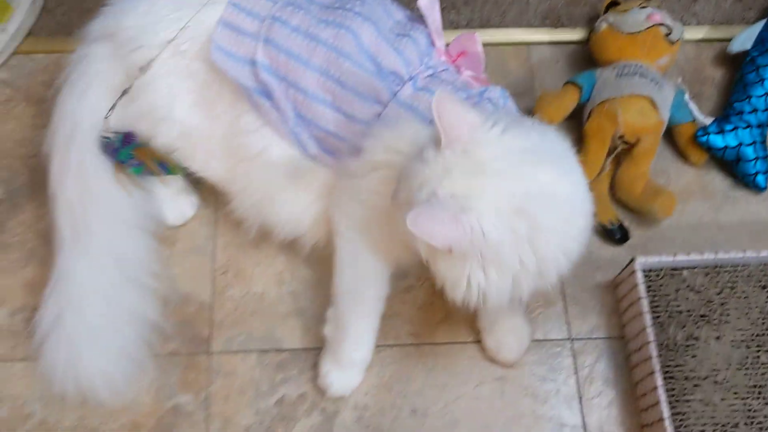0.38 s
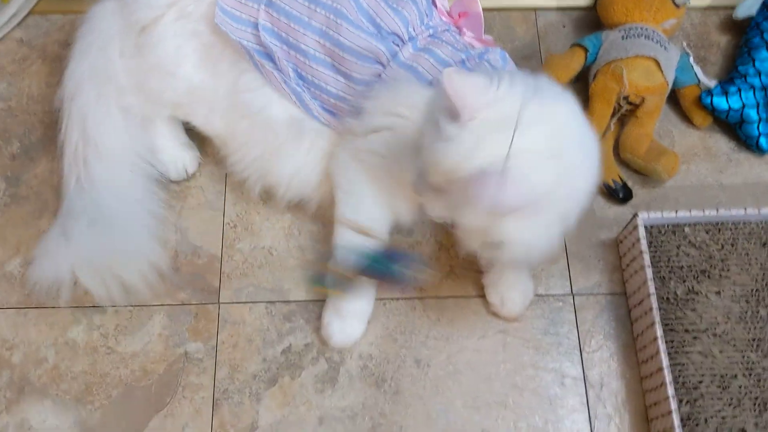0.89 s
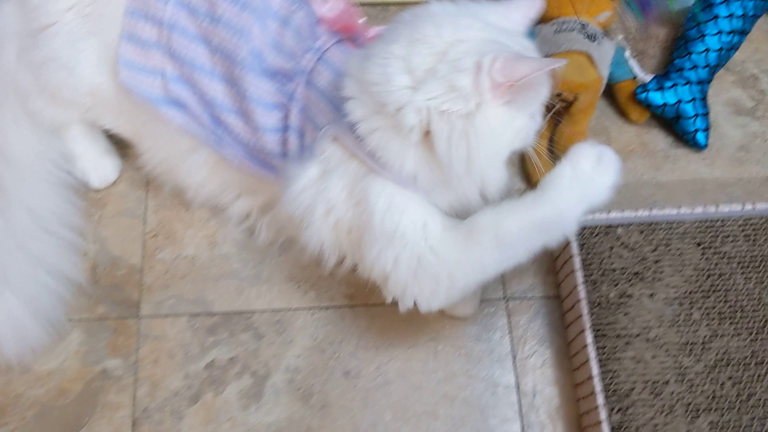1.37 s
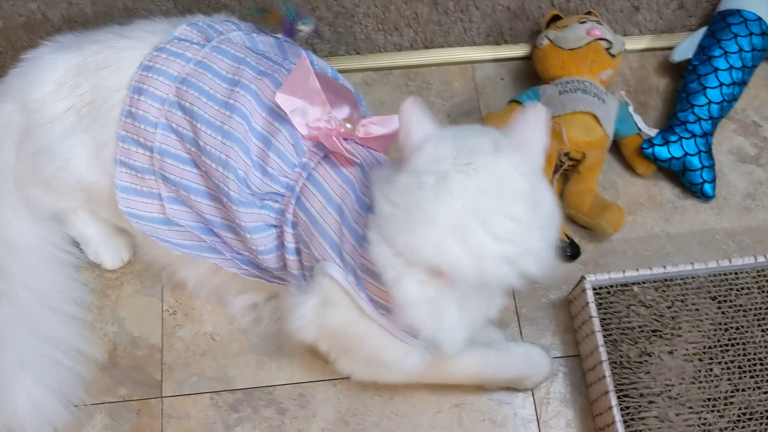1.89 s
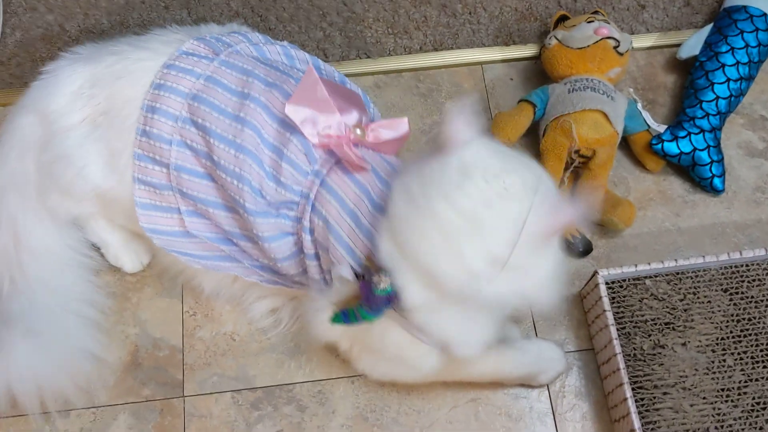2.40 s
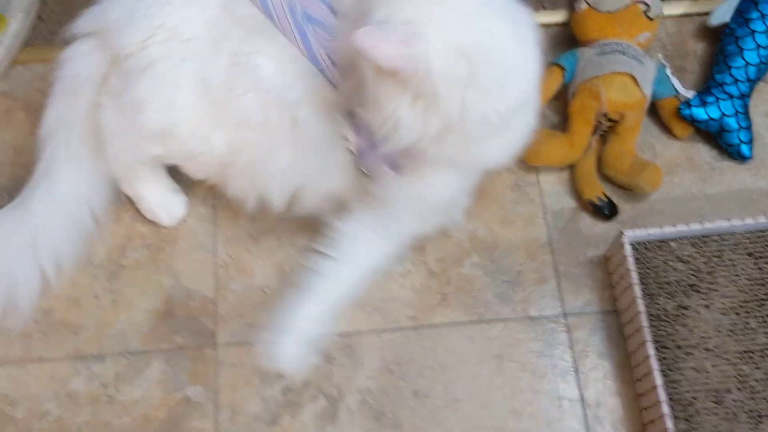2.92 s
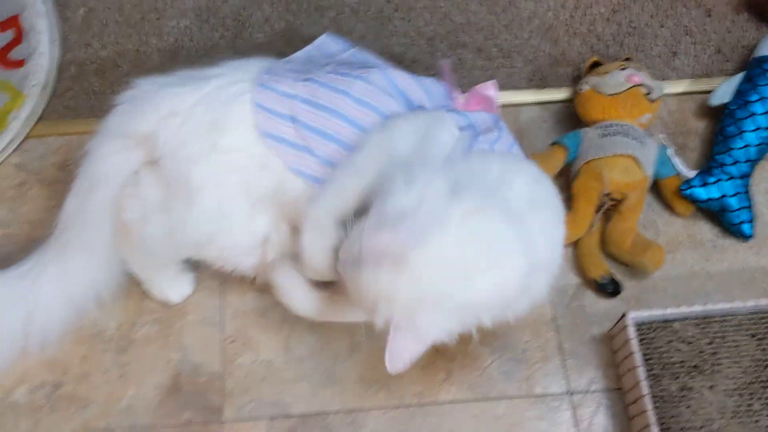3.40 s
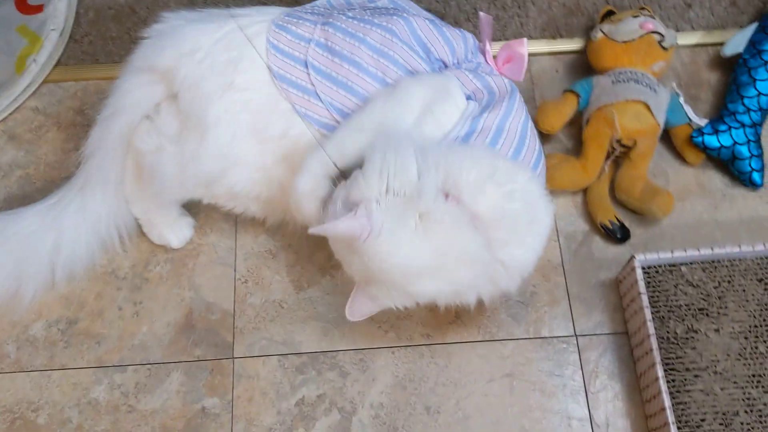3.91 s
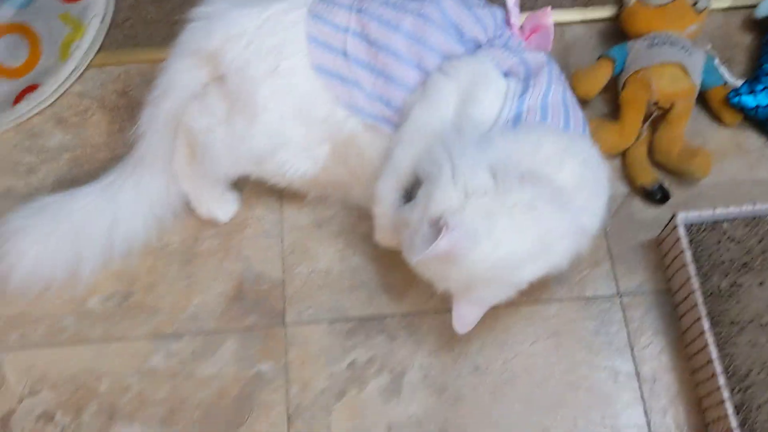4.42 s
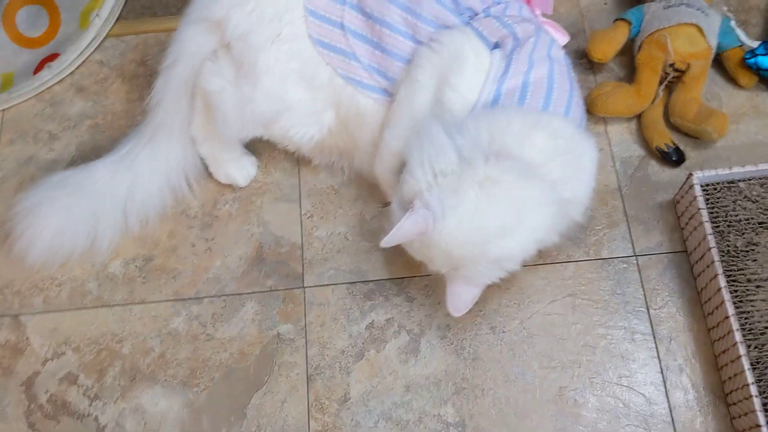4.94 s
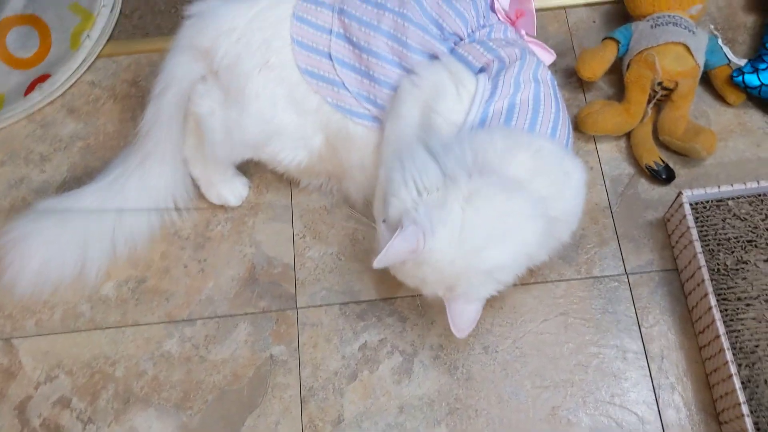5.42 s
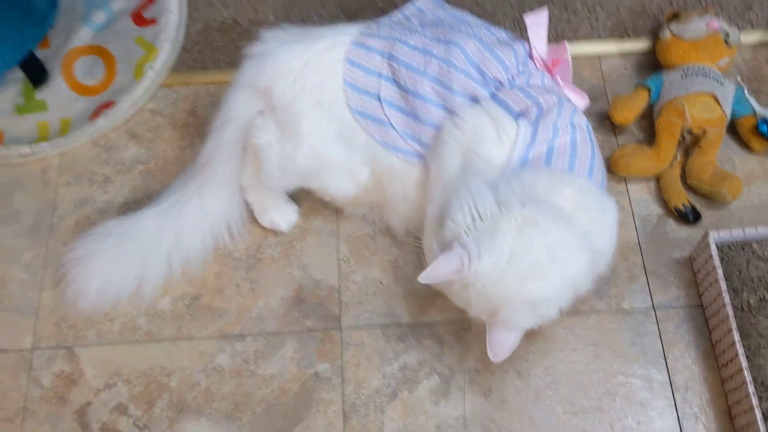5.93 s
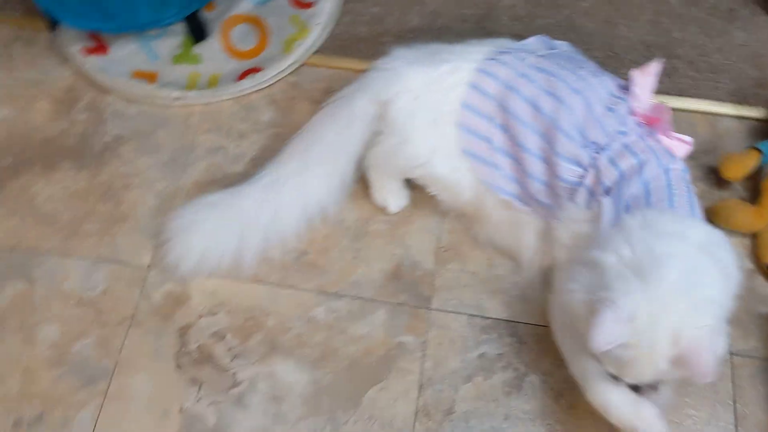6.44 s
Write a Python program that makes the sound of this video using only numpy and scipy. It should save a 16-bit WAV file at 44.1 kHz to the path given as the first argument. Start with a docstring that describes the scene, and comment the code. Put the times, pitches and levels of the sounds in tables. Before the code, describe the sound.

Bright, tiny jingles and dry claw clicks on a tile floor, over quiet rumbling room tone, a faint whine and dull bumps from the hand-held microphones.

```python
"""Cat and feather toy on tile

A cat wrestles a feather toy on a tile floor in a quiet room, close to a hand-held pair of microphones.
The collar bell and the toy's bell are sums of decaying modes driven by a loose pellet; claws tick on the
tile as noise snaps with scuffs, the coat rustles in grains, and the hand jolts the case in short swings.
Room tone is shaped noise and the whine a set of wavering sines. The right microphone is open and bright;
the left one is muffled and hears mostly rumble and whine."""
import sys
import numpy as np
from scipy import signal
from scipy.fft import rfft, irfft
from scipy.io import wavfile
from scipy.ndimage import uniform_filter1d

SR = 44100
rng = np.random.default_rng(int(sys.argv[2]) if len(sys.argv) > 2 else 0)


def natural_amplitude(level_db):
    """Convert a level in decibels to a linear amplitude factor, elementwise."""
    exponent = np.asarray(level_db, float) / 20
    return 10 ** exponent


def transcribe(u):
    """Save the signal u as a 16-bit wav file named by the first command-line argument.

    u: samples, shape (n,) or (channels, n), limited to [-1, 1]; the rate is SR.
    q: integer samples, one column per channel.
    """
    v = np.clip(np.atleast_2d(u).T, -1, 1)
    q = np.round(v * 32767).astype(np.int16)
    wavfile.write(sys.argv[1], SR, q)


N = 289737  # samples
LAG_S = .0003  # s by which the left microphone hears shared sound late

# strikes of each bell's pellet: t/s, peak level/dB, f/Hz of the mode struck best,
# lift/dB of the modes below 10 kHz
COLLAR_STRIKES = [(1.1199, -40, 12900, 2), (1.14, -33.5, 14600, 8), (1.1694, -31, 13310, 14),
                  (1.2098, -46, 12300, 2), (1.2855, -43.5, 12520, -2), (1.6965, -46.5, 12600, 2),
                  (1.7423, -42.5, 12650, 0), (1.8213, -35, 12600, 8), (1.8706, -46, 12100, 0),
                  (2.0155, -44, 12650, 13), (2.123, -45, 12300, 0), (2.5905, -44, 13100, 7),
                  (2.6319, -39, 13720, 0), (2.6623, -25, 12600, -6), (2.6893, -27, 13720, 8),
                  (2.707, -20, 12700, 5), (2.73, -40, 12000, 6), (2.7641, -47, 13100, 2),
                  (2.7967, -30, 12900, 7), (2.806, -16, 12300, 2), (2.925, -36.5, 12670, 6),
                  (2.9851, -40, 13720, 4), (3.016, -37, 14600, 3), (3.3757, -45, 14500, 18),
                  (3.4191, -40.5, 12900, 13), (3.4594, -45, 13000, 6), (3.495, -37, 13530, 6),
                  (6.349, -32, 14600, 9), (6.3744, -35.5, 14600, 2)]
TOY_STRIKES = [(4.6105, -41, 14000, 13), (4.629, -35.5, 13400, 6), (4.6825, -30.5, 14250, 3),
               (4.793, -17, 14200, -4), (4.8843, -27, 14100, -31), (4.9, -37, 12100, -29),
               (4.929, -43, 13700, 6), (4.9743, -32, 14270, 3), (4.999, -20.5, 13000, 1),
               (5.0297, -36, 13600, -1), (5.0988, -40.5, 11860, -10), (5.123, -48, 11800, -9),
               (5.2014, -46, 12260, -26), (5.2424, -51, 12260, -25), (5.284, -53, 11760, -24),
               (5.3453, -49, 12850, -28), (5.4286, -24.5, 13370, -4)]
# colour of small contact sounds in the open microphone: f/Hz, relative level/dB; the sounds end steeply just
# above 16 kHz
OPEN_COLOUR = [(600, -39), (1100, -13), (1600, -12), (3000, -2.5), (6000, 4), (8600, -2.5), (10500, 8),
               (13000, 4), (15700, 4), (16050, -27)]


def evened(x):
    """Normalization: scales a signal to an rms value of 1."""
    return x / np.sqrt(np.mean(x ** 2) + 1e-20)


def read(f, value, hz):
    """Interpolation of a spectrum by straight lines on a log-frequency axis."""
    return np.interp(np.log(hz + 1), np.log(np.add(f, 1)), value)


def add(mix, s, sound):
    """Superposition: adds a sound to the mix in place from time s."""
    part = mix[max(round(s * SR), 0):][:len(sound)]
    part += sound[:len(part)]


def slow(rate_hz):
    """Random modulation of rms 1: sines of random phase over the decade up to rate_hz."""
    t = np.arange(N) / SR
    rates = np.geomspace(rate_hz / 10, rate_hz, 16)
    return evened(sum(np.sin(2 * np.pi * (f * t + rng.random())) for f in rates))


def room_tone():
    """Partly coherent noise in two channels, shaped by frequency; the trembling hand makes the bass lumpy."""
    # steady spectrum: f/Hz, relative left level/dB, relative right level/dB
    air_spectrum = [(20.4, -83, -83), (42.8, -64.5, -66), (79, -54.5, -71.5), (101, -63.5, -65.5),
                    (133, -69.5, -57.5), (180, -68.5, -67), (290, -74.5, -71.5), (535, -82.5, -81.5),
                    (658, -80, -81.5), (790, -93.5, -84), (1430, -90.5, -84), (2120, -94.5, -91.5),
                    (4570, -97, -98.5), (6100, -102, -102), (8450, -105, -105), (9900, -106, -102),
                    (13000, -114, -95.5), (16500, -123, -102.5)]
    # coherence between the microphones: f/Hz, left-right likeness (1 = identical)
    likeness = [(40, .8), (130, .7), (300, .8), (600, .8), (800, .55), (1200, .05), (16000, 0)]
    # narrow bands that stand out: f/Hz, width/Hz, left rise/dB, right rise/dB
    hum_bands = [(228, 25, 4, 3), (395, 70, 3, 3), (595, 40, 4, 4), (2010, 30, 4, 0), (2400, 200, 0, 3),
                 (6250, 400, 2, 5), (6950, 300, 2, 4), (9550, 300, 4, 0), (12270, 90, 0, 4),
                 (13750, 240, 11, 8), (14620, 240, 13, 9), (15600, 300, 14, 3)]
    rms_db, edge_hz = -48.5, 15830  # level of the whole; nothing is made above the edge
    bass_lag = 1.77  # rad, further phase lag of the left in the deepest bass

    frames, hz = N // 512 + 5, np.fft.rfftfreq(2048, 1 / SR)
    a, b, c, d, patches = rng.standard_normal((frames, 1025, 5)).T
    left = a + 1j * b
    same = np.clip(read(*np.transpose(likeness), hz), -1, 1)[:, None]
    right = same * left + np.sqrt(1 - same ** 2) * (c + 1j * d)
    z = np.array([left, right])
    lag = 2 * np.pi * hz * LAG_S + bass_lag / (1 + (hz / 150) ** 2)
    z[0] *= np.exp(-1j * lag)[:, None]

    # neighbouring times and frequencies swell together
    patch_db = 0.95 * evened(uniform_filter1d(uniform_filter1d(patches, 6, 1), 12, 0))
    z *= (hz < edge_hz)[:, None] * natural_amplitude(patch_db)

    f, *sides = np.transpose(air_spectrum)
    level_db = np.array([read(f, side, hz) for side in sides])
    for peak_hz, width_hz, *rise_db in hum_bands:
        level_db = level_db + np.outer(rise_db, np.exp(-(2 * (hz - peak_hz) / width_hz) ** 2))
    tremble_db = 4.23 * evened(uniform_filter1d(rng.standard_normal(frames), 3))
    z *= natural_amplitude(level_db[..., None] + tremble_db / (1 + (hz[:, None] / 170) ** 4))
    return natural_amplitude(rms_db) * evened(signal.istft(z, nperseg=2048, noverlap=1536)[1][:, :N])


def whine():
    """Amplitude modulation: thin sine tones whose levels waver, each reaching the left a little late."""
    # tones: f/Hz, left rms level/dB, right rms level/dB, rms wavering/dB
    whine_tones = [(376.5, -71, -69, 3.0), (413.5, -72, -71, 3.0), (472.5, -74, -73, 3.0),
                   (591, -71, -70, 2.5), (4501, -77.5, -83.5, 4.0)]
    out = np.zeros((2, N))
    late = np.arange(N) / SR - [[LAG_S], [0]]
    for hz, left_db, right_db, waver_db in whine_tones:
        tone = np.sin(2 * np.pi * (hz * late + rng.random())) * natural_amplitude(waver_db * slow(36))
        out = out + natural_amplitude([[left_db], [right_db]]) * evened(tone)
    return out


def rustle():
    """Granular friction: random tiny crackles of fur and cloth, denser around each jingle as the coat shifts."""
    rms_db, grains_per_s = -75, 98  # the rate is that between jingles, before its slow drift
    stir_s, grain_decay_s = 0.033, 0.0093
    t = np.arange(N) / SR
    stir = sum(np.exp(-((t - hit[0]) / stir_s) ** 2) for hit in COLLAR_STRIKES + TOY_STRIKES)
    busy = natural_amplitude(1.5 * slow(3.6)) * (1 + stir)
    size = natural_amplitude(3.5 * np.minimum(rng.exponential(1, N), 3))
    size = size * (rng.random(N) < busy * grains_per_s / SR)
    grain = np.exp(-np.arange(1500) / (grain_decay_s * SR))
    puff = rng.standard_normal(N) * signal.oaconvolve(size, grain)[:N]
    colour = natural_amplitude(read(*np.transpose(OPEN_COLOUR), np.fft.rfftfreq(N, 1 / SR)))
    return natural_amplitude(rms_db) * evened(irfft(rfft(puff) * colour, N))


def ticks():
    """Impact and friction: claws and toy give a snap of about a millisecond, then a dying scuff of small grains."""
    # contacts with the tile: t/s, strength/dB, lift of the lows/dB, scuff level relative to strength/dB
    tile_contacts = [(0.021, -42, 1, -10), (0.2637, -51, 14, -22), (2.2744, -48, -7, -10),
                     (2.356, -34, -3, -17), (2.987, -47.5, 3, -4), (3.024, -48, -6, -25),
                     (3.0468, -20, -6.5, -20.5), (3.058, -41, -12, -21), (3.303, -43, -24, -22),
                     (3.4955, -42, -3, -16), (3.573, -53, 6, -20), (4.0134, -50, -11, -22),
                     (4.6141, -45, 22, -8.5), (4.795, -29.5, -5, -22), (4.8847, -42.5, 4, -8.5),
                     (4.897, -42, 5, -12), (5.429, -35.5, -2, -18), (6.107, -44, -9, -2),
                     (6.2143, -49, -2, -3), (6.246, -43.5, 28, -13), (6.2785, -40.5, -12, -8.5),
                     (6.3505, -43, 5, -18), (6.505, -49.5, -4, 1), (6.535, -50, 0, -3)]
    scuff_t60, scuff_rise_s = 0.13, 0.00097  # s
    snap_size, snap_decay_s = 3.0, .00025
    push = 0.27  # one-sided push that gives the snap its lows

    out, t, hz = np.zeros(N), np.arange(8192) / SR, np.fft.rfftfreq(8192, 1 / SR)
    colour_db = read(*np.transpose(OPEN_COLOUR), hz)
    for s, strength_db, low_db, scuff_db in tile_contacts:
        hiss, chance = rng.standard_normal((2, 8192))
        grains = .5 + 12.6 * uniform_filter1d(1. * (chance > 2.6), 30)
        scuff = hiss * grains * natural_amplitude(scuff_db - 60 * t / scuff_t60)
        snap = (hiss + push) * np.exp(-t / snap_decay_s) * (t < 4 * snap_decay_s)
        snap = snap_size * snap / np.linalg.norm(snap)
        drive = np.roll(scuff * (1 - np.exp(-t / scuff_rise_s)) + snap, 64)
        # a soft blow is stronger in the lows, and deeper
        corner_hz = 6000 * np.exp(-max(low_db - 5.5, 0) / 30)
        tilt_db = low_db / (1 + (hz / corner_hz) ** 4)
        sound = irfft(rfft(drive) * natural_amplitude(colour_db + tilt_db))
        add(out, s - 30 / SR, natural_amplitude(strength_db) * sound)
    return out


def jolts():
    """Forced resonance: a hand jolt is a swing falling in pitch on the left; on the right it rings the mount."""
    # jolts of the case: t/s, left swing level/dB, right ring peak level/dB
    hand_jolts = [(0.2648, -30.5, -41), (0.335, -31.5, -40), (0.7547, -37, -40), (1.635, -31.5, -34.5),
                  (1.9455, -36, -43), (3.166, -31.5, -37.5), (3.4545, -10.5, -17), (3.482, -13, -18.5),
                  (3.5112, -26.5, -54), (3.836, -8.5, -24), (3.858, -8.5, -13.5), (3.877, -14, -17.5),
                  (4.1497, -28, -38.5), (4.1996, -34.5, -36), (4.246, -32, -44), (4.469, -35.5, -38.5),
                  (4.516, -28.5, -35.5), (4.583, -22.5, -30), (4.67, -30.5, -35), (4.7119, -14.5, -28),
                  (4.754, -30, -33.5), (5.6468, -32.5, -39)]
    # modes of the right microphone's mount: f/Hz, relative level/dB, t60/s
    mount_modes = [(125, 15.5, 0.089), (157.5, -4, 0.04), (242, -15, 0.077)]
    # colour of skin slipping on the case: f/Hz, relative level/dB
    skin_colour = [(60, -10), (200, -1.5), (350, -25), (800, -35.5), (1100, -44.5), (2000, -110)]
    lead_s, lead_hz, lead_db = .018, 155, -21  # a quick small swing runs ahead of each jolt
    glide_s = 0.3  # time for the pitch to fall by a factor e

    out, u, t = np.zeros((2, N)), np.arange(-2205, 2205) / SR, np.arange(6000) / SR
    mount = sum(natural_amplitude(db - 60 * t / t60) * np.sin(2 * np.pi * hz * t) for hz, db, t60 in mount_modes)
    colour = natural_amplitude(read(*np.transpose(skin_colour), np.fft.rfftfreq(len(u), 1 / SR)))
    early = u + lead_s
    lead = np.cos(2 * np.pi * lead_hz * early) * np.exp(-(early * lead_hz / 0.6) ** 2)
    for s, left_db, right_db in hand_jolts:
        hz = 98.7 + .5 * left_db  # softer jolts swing slower
        turns = hz * glide_s * (1 - np.exp(-u / glide_s))
        swing = np.cos(2 * np.pi * turns) * np.exp(-(u * hz / 0.61) ** 2) + natural_amplitude(lead_db) * lead
        acceleration = np.gradient(np.gradient(swing))  # this is what the mount feels
        ring = signal.oaconvolve(acceleration, mount)
        # skin rubs the case just before the jolt
        rub = evened(irfft(rfft(rng.standard_normal(len(u))) * colour))
        rub = rub * np.exp(-((u + 0.009) / .012) ** 2)
        add(out[0], s + u[0], natural_amplitude(left_db) * (swing + natural_amplitude(-30.5) * rub))
        add(out[1], s + u[0] + 0.00097, natural_amplitude(right_db) * ring / abs(ring).max())
        add(out[1], s + u[0] - LAG_S, natural_amplitude(left_db - 18.5) * rub)
    return out


def settled(strikes):
    """Secondary impacts: some time after each strike the pellet rolls back with a faint tinkle of like colour."""
    mean_wait_s, loudest_db = .16, -52
    wait, drop = rng.exponential(1, (len(strikes), 2)).T
    late = [(s + mean_wait_s * w, loudest_db - 3.0 * k, *colour)
            for (s, _, *colour), w, k in zip(strikes, wait, drop)]
    return strikes + late


def bell(modes, strikes, focus_hz, detune):
    """Modal synthesis: each strike favours one mode, then the loose pellet rattles on, catching other modes."""
    rise_s, flash_s, rattle_s = .0011, 0.0055, 0.013
    touches_per_s = 600
    out, t = np.zeros(N), np.arange(6000) / SR
    hz, db, t60 = np.transpose(modes)[..., None]
    for s, peak_db, best_hz, low_db in strikes:
        spread, tune, damp = rng.standard_normal((3, len(hz), 1))
        lift_db = 18 * np.exp(-((hz - best_hz) / focus_hz) ** 2) + low_db * (hz < 1e4)
        decay_db = 60 * t / (t60 * np.exp(0.1 * damp))  # fur damps the shell unevenly
        tones = np.sin(2 * np.pi * hz * (1 + detune * tune) * t)
        rings = natural_amplitude(db + lift_db + 3.0 * spread - decay_db) * tones
        rise = np.sin(np.pi / 2 * np.minimum(t / rise_s, 1)) ** 2
        rings *= rise * natural_amplitude(peak_db) / abs(rings.sum(0)).max()
        # the pellet falls back and mutes the first flash
        rings *= 0.3 + 0.7 * np.exp(-(t / flash_s) ** 2)
        # a clean hard strike throws the pellet clear; softer ones rebound more
        rebound = np.clip((-24 - peak_db) / 9, 0, 1)
        touches = (rng.random(len(t)) < touches_per_s / SR) * np.exp(-t / rattle_s) * rebound
        drive = touches * rng.standard_normal(rings.shape) + (t == 0)
        add(out, s, signal.fftconvolve(rings, drive, axes=1).sum(0))
    return out


def collar_bell():
    """Modal ringing of the tiny bell on the cat's collar."""
    # modes of the shell: f/Hz, relative level/dB, t60/s
    collar_modes = [(6240, -28, .06), (6340, -27, .07), (9350, -24, .04), (11400, -18, .03),
                    (12090, -11, .045), (12270, -2, .06), (12345, -1, .045), (12500, -8, .04),
                    (12900, -13, .03), (13310, -9, .035), (13720, -2, .045), (14150, -12, .03),
                    (14600, -6, .04), (15300, -14, .03)]
    return bell(collar_modes, settled(COLLAR_STRIKES), focus_hz=300, detune=.002)


def toy_bell():
    """Modal ringing of the toy's bell."""
    # modes of the shell: f/Hz, relative level/dB, t60/s
    toy_modes = [(6070, -13, .06), (6170, -4, .1), (6230, -5, .09), (6330, -1, .11), (6450, -13, .05),
                 (7800, -17, .05), (9750, -4, .11), (10900, -18, .03), (11760, -10, .06), (12260, -10, .05),
                 (12850, -11, .045), (13050, -10, .04), (13370, -3, .055), (13700, -7, .04),
                 (13950, -5, .04), (14270, -3, .05), (14620, -8, .04), (15100, -13, .03)]
    return bell(toy_modes, settled(TOY_STRIKES), focus_hz=350, detune=.003)


def echo(x):
    """Exponential reverberation: sparse taps of random sign, one in every 20 samples, dying away."""
    t60 = 0.2  # s
    taps, at = np.zeros(SR // 2), np.arange(120, SR // 2 - 20, 20)
    signs = rng.choice([-1., 1.], len(at))
    taps[at + rng.integers(0, 20, len(at))] = signs * natural_amplitude(-60 * at / SR / t60)
    return signal.oaconvolve(x, taps / np.linalg.norm(taps))[:N]


def scene():
    """Superposition: bright sounds and their echo reach only the right microphone; the rest reaches both."""
    near = collar_bell() + toy_bell() + ticks() + rustle()
    out = room_tone() + whine() + jolts()
    add(out[1], 0, near + natural_amplitude(-3) * echo(near))
    return out


def top_cut(x):
    """Nothing passes above the cut-off."""
    return signal.sosfilt(signal.butter(12, 16480, fs=SR, output="sos"), x)


def record(dry):
    """High-pass filtering: the microphones lose the deepest bass, below 36 Hz."""
    high_pass = signal.butter(4, 36, "high", fs=SR, output="sos")
    mix = signal.sosfilt(high_pass, dry)
    return top_cut(mix)


dry = scene()
out = record(dry)
transcribe(out)
```